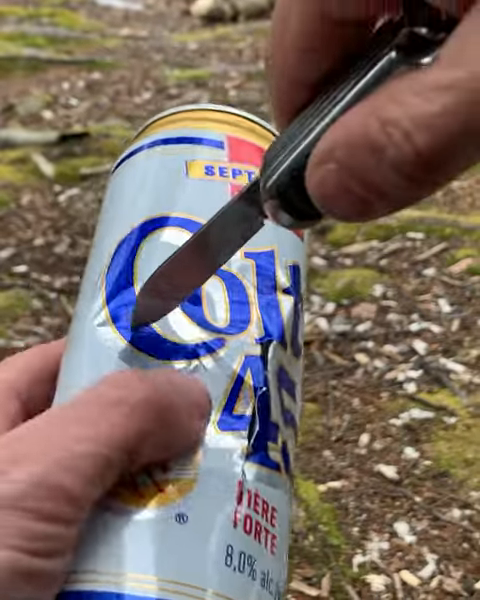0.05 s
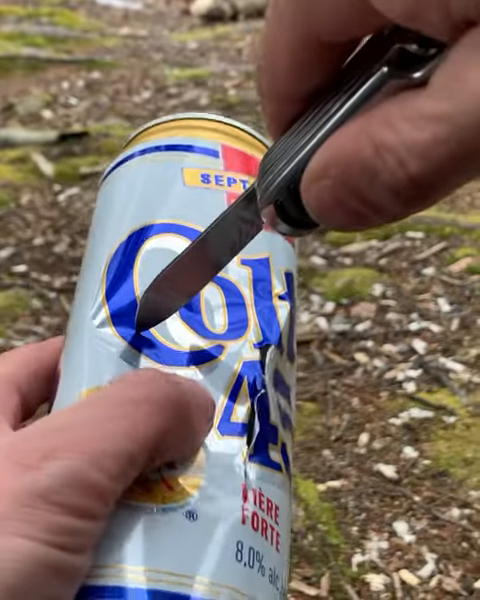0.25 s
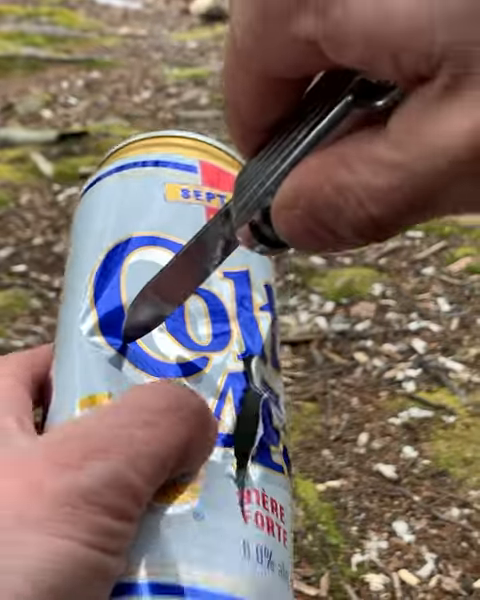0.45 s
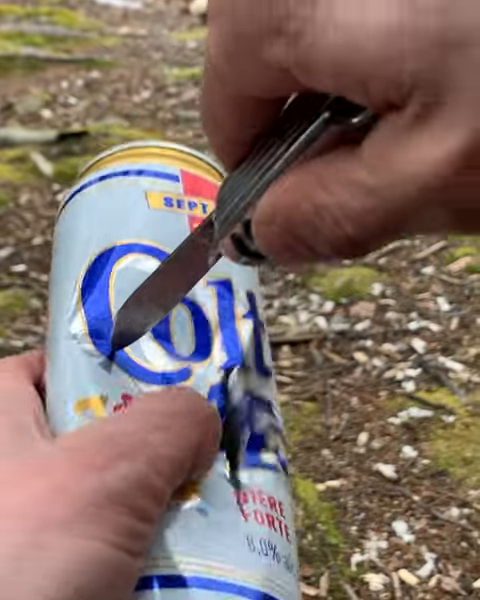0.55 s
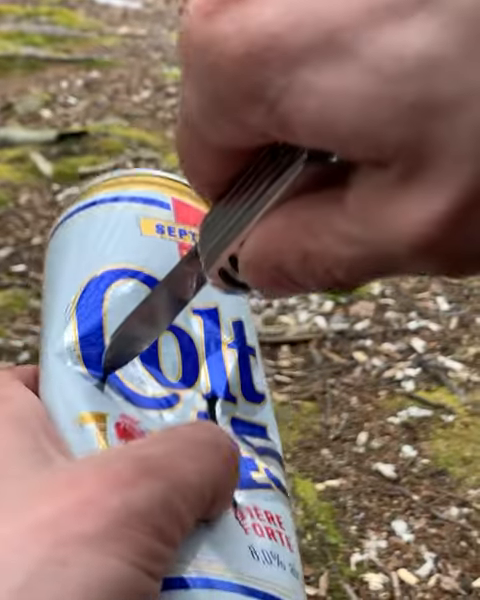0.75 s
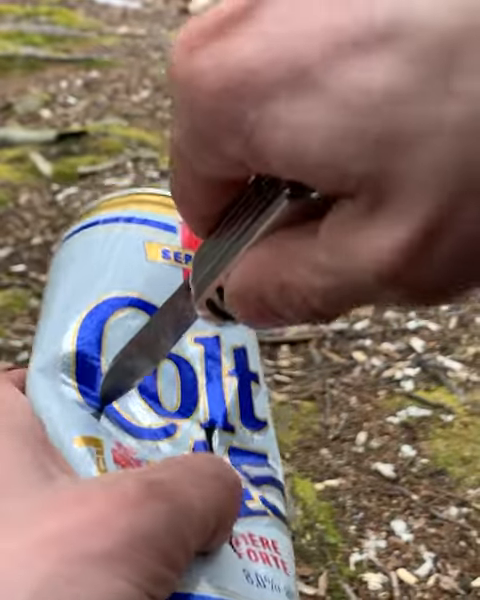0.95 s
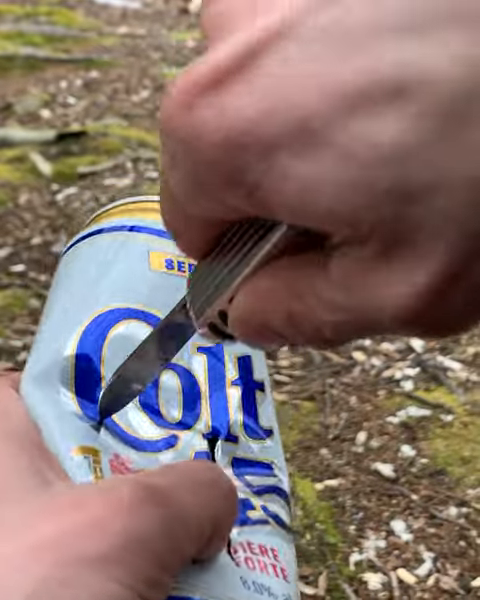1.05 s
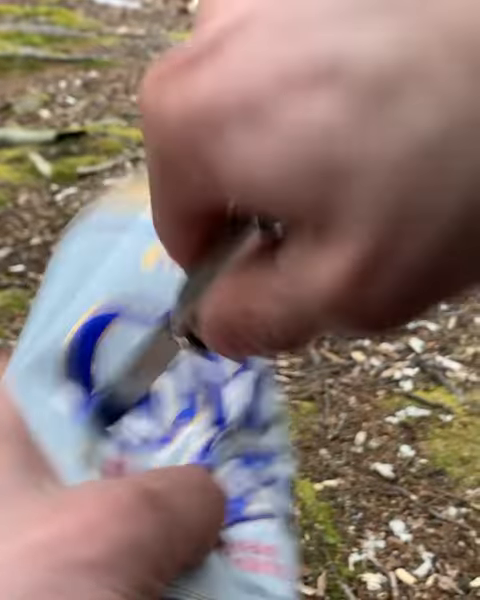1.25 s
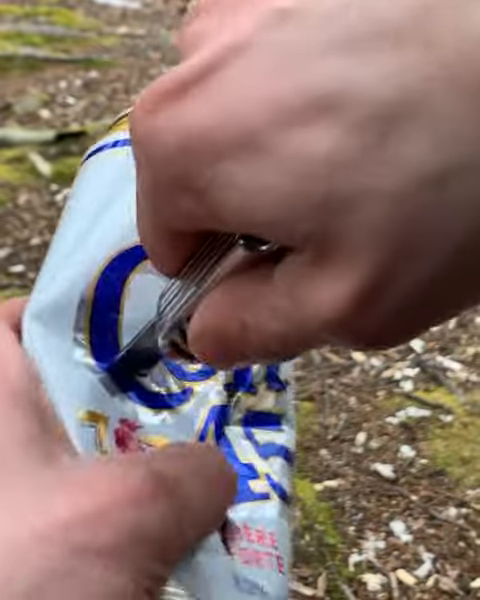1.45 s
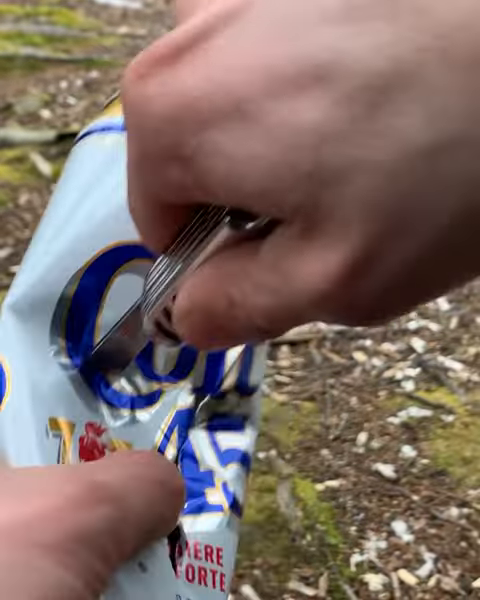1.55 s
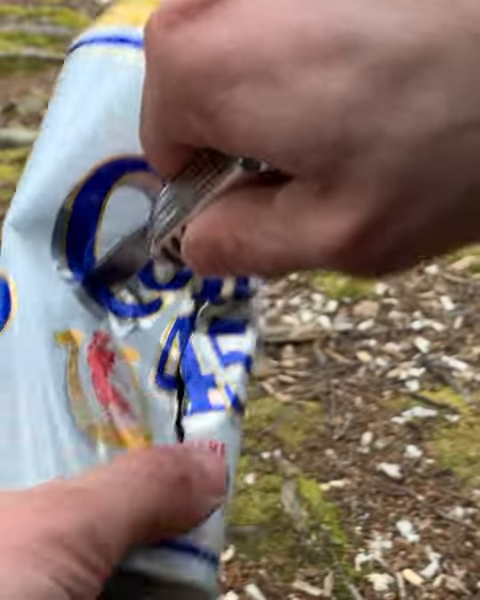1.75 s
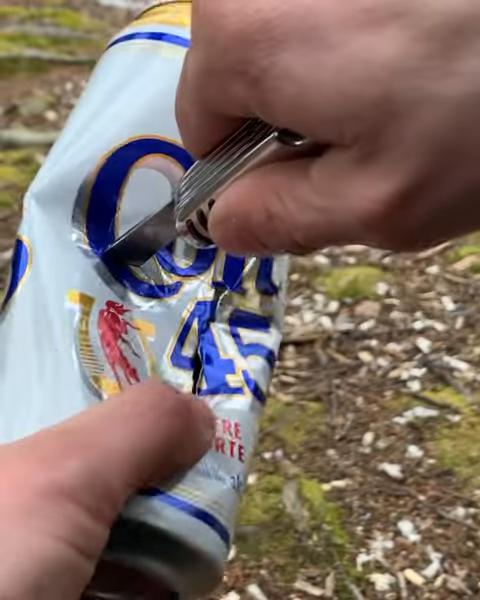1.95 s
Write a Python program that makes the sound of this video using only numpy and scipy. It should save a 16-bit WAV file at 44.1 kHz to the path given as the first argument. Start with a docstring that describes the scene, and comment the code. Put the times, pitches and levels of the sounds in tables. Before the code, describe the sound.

An empty aluminium can buckles under a knife point, close to the microphone. Scattered hollow pops and sharp clicks build into two dense crunches with faint scraping, over a soft outdoor rumble and hiss.

```python
"""Outdoors, close to the microphone: a knife point is pressed into an empty aluminium can.
Low rumble and soft hiss lie behind it. Up close, the blade scrapes faintly and the stressed foil ticks.
Wall panels snap through with short hollow pops; creases form with bright cracks, twice in a dense
crunch, and the thin shell rings briefly."""
import sys
import numpy as np
from scipy.fft import rfft, irfft, next_fast_len
from scipy.io import wavfile
from scipy.ndimage import map_coordinates

SR = 44100
rng = np.random.default_rng(int(sys.argv[2]) if len(sys.argv) > 2 else 0)


def store_wav(level_fs):
    """Save 16-bit WAV to argv[1]."""
    pcm = np.round(np.clip(np.atleast_2d(level_fs), -1, 1) * 32767)
    wavfile.write(sys.argv[1], SR, pcm.T.astype(np.int16))


N = 88200
TOP_HZ = 16900  # upper limit of the cracks and of the recorder


def amp(db):
    """Decibels to gain."""
    return 10 ** (np.asarray(db) / 20)


def unit(x):
    """Scale to rms 1."""
    return x / np.sqrt(np.mean(x ** 2) + 1e-20)


def colour(points, hz):
    """Gain at hz from (f/Hz, level/dB) points on a log frequency axis."""
    freqs, dbs = np.transpose(points)
    return amp(np.interp(np.log(hz + 1), np.log(freqs + 1), dbs))


def level(points):
    """Gain per sample from (t/s, level/dB) points."""
    return amp(np.interp(np.arange(N) / SR, *np.transpose(points)))


def filtered(x, response):
    """Pass x through a frequency response."""
    size = 2 * next_fast_len(len(x))
    return irfft(rfft(x, size) * response(np.fft.rfftfreq(size, 1 / SR)), size)[:len(x)]


def noise(spectrum):
    """Noise of rms 1, coloured by (f/Hz, level/dB) points."""
    return unit(filtered(rng.standard_normal(N), lambda hz: colour(spectrum, hz)))


def causal(gain):
    """Minimum-phase response with the given gain."""
    cepstrum = irfft(np.log(np.maximum(gain, 1e-6)))
    half = len(cepstrum) // 2
    cepstrum[1:half] *= 2
    cepstrum[half + 1:] = 0
    return np.exp(rfft(cepstrum))


def band(hz, lo_hz, hi_hz, order=5):
    """Band gain that keeps the power of white noise."""
    low_cut = 1 + (lo_hz / (hz + 1)) ** (2 * order)
    high_cut = 1 + (hz / hi_hz) ** (2 * order)
    return unit((low_cut * high_cut) ** -.5)


def wobble(rate, size):
    """A smooth random curve, rate knots a second."""
    knots = rng.standard_normal(int(size * rate / SR) + 4)
    return map_coordinates(knots, [np.arange(size) * rate / SR])


def add(out, start, sound):
    """Mix a sound in at start seconds."""
    part = out[max(round(start * SR), 0):][:len(sound)]
    part += sound[:len(part)]


# Colour of the rumble and the hiss behind the can: f/Hz, relative level/dB
RUMBLE_SPECTRUM = [(12, -36), (25, -18.5), (42, -3.5), (55, -6.5), (65, 2), (78, -8), (120, -8), (155, -17),
                   (230, -17.5), (400, -65)]
AIR_SPECTRUM = [(160, -14), (260, 3), (550, -1.5), (700, -6.5), (1250, -9.5), (1800, -21), (2800, -23),
                (6000, -31), (9000, -47.5), (16000, -48)]
# Their rise and fall: t/s, level/dB
RUMBLE_ENVELOPE = [(0, -39.5), (.4, -37), (1.1, -40.5), (1.25, -41.5), (1.35, -54.5), (1.5, -40.5),
                   (1.62, -52), (1.75, -39), (2, -42)]
AIR_ENVELOPE = [(0, -45.5), (1.2, -46), (1.35, -49.5), (1.62, -49), (1.8, -46.5), (2, -48.5)]


def outdoors():
    """Low rumble and soft hiss of open air; both dip after the loudest crunches."""
    rumble = level(RUMBLE_ENVELOPE) * noise(RUMBLE_SPECTRUM)
    hiss = level(AIR_ENVELOPE) * noise(AIR_SPECTRUM)
    return rumble + hiss


# Blade friction, faint even this close: t/s, level/dB
SCRAPE_ENVELOPE = [(0, -79), (.23, -71), (.27, -69), (.6, -73.5), (.8, -70), (1.1, -81.5), (1.2, -56.5),
                   (1.33, -49.5), (1.44, -57), (1.63, -58), (1.71, -53), (1.82, -60), (1.9, -82), (2, -79)]
# Colour of the friction and the ticks: f/Hz, relative level/dB
SCRAPE_SPECTRUM = [(300, -16), (1500, -3.5), (4000, 3), (7000, -1), (11000, 2), (16000, 3.5)]


def scrape(ticks_per_s=15, max_tick_db=-56, tick_t60=.008):
    """The blade slides on the wall with a fine hiss, and the stressed foil ticks."""
    ticks, t = np.zeros(N), np.arange(SR // 50) / SR
    for when, size in rng.random((int(ticks_per_s * N / SR), 2)):
        add(ticks, when * N / SR, size * amp(max_tick_db - 60 * t / tick_t60))
    return (level(SCRAPE_ENVELOPE) + ticks) * noise(SCRAPE_SPECTRUM)


# Resonances of the thin shell: f/Hz, width/Hz, relative level/dB
SHELL_MODES = [(848, 20, -15.5), (1288, 17, -7), (2046, 44, -6.5), (2013, 15, -7.5), (2670, 57, -3),
               (3080, 60, -13.5), (3454, 100, -9.5), (3860, 81, -12), (5140, 89, -16), (6940, 140, -6.5),
               (9800, 110, -17.5), (10570, 160, -10), (11200, 130, -12)]


def shell(excitation, direct_db=-3.5, modes_db=2.5):
    """The can's wall adds its resonances to whatever excites it."""
    def response(hz):
        modes = sum(amp(db + modes_db) * 1j * hz * width / (centre ** 2 - hz ** 2 + 1j * hz * width)
                    for centre, width, db in SHELL_MODES)
        return amp(direct_db) + modes
    return filtered(excitation, response)


# Panels left ringing: t/s, level/dB, starting f/Hz, glide/(Hz/s), t60/s
TAUT_PANELS = [(.425, -21, 645, -700, 0.14), (.418, -22.5, 530, -3, 0.14), (.79, -19.5, 1250, -2, 0.048),
               (1.152, -32.5, 670, -250, 0.34), (1.155, -24.5, 540, 0, .08), (1.263, -15.5, 905, -4, .11),
               (1.262, -10.5, 640, 3, 0.095), (1.523, -15, 1000, 0, .12), (1.585, -17.5, 441, -200, 0.088)]


def panel_rings(rise_s=.003):
    """Panels that stay taut ring on, each a dying tone; some slide down in pitch."""
    out, t = np.zeros(N), np.arange(SR // 4) / SR
    for start, db, hz, glide, t60 in TAUT_PANELS:
        envelope = amp(db - 60 * t / t60) * (1 - np.exp(-t / rise_s))
        add(out, start, envelope * np.sin(2 * np.pi * (hz + glide * t / 2) * t))
    return out


# Wall panels snapping through, close up: t/s, level/dB, f/Hz at the peak, swell/s
PANEL_SNAPS = [(0.078, -22, 436, 0.0036), (.0785, -23, 1022, 0.0024), (.239, -15.5, 690, .0015),
               (.2395, -17, 397, 0.0039), (.414, -15.5, 601, 0.0091), (.417, -11, 372, 0.0058),
               (.417, -20, 925, 0.0029), (0.4903, -19.5, 412, 0.0039), (.556, -22.5, 441, 0.0066),
               (0.571, -19, 375.5, 0.0098), (.5995, -20, 540, 0.0036), (.607, -24.5, 459, .005),
               (.778, -13.5, 481, 0.002), (.788, -11, 442, 0.0077), (.7878, -17, 1035, 0.0021),
               (.8255, -25, 516, 0.0024), (0.891, -13.5, 440, 0.0084), (.9878, -14.5, 547, 0.0017),
               (.995, -23, 492, 0.0091), (1.089, -11.5, 470, 0.0031), (1.098, -20, 477, 0.0027),
               (1.146, -8.5, 686, 0.0039), (1.1465, -15.5, 447, 0.0022), (1.2588, -3.5, 455.4, 0.0011),
               (1.272, -11, 487, 0.002), (1.2765, -22.5, 813, .004), (1.291, -13, 405, 0.0027),
               (1.447, -30.5, 463, 0.012), (1.4709, -14, 442, 0.0041), (1.482, -13.5, 530, 0.0025),
               (1.519, -5, 491, 0.0035), (1.5312, -6, 394, .003), (1.562, -11.5, 463, 0.00293),
               (1.581, -14, 472, 0.002), (1.751, -26.5, 983, 0.0026), (1.926, -22.5, 615, .0045),
               (1.957, -34, 500, 0.0057)]


def panel_pops(steepness=2.93, pitch_sag=.21, settle_s=.0083, ring_db=-17.5, ring_t60=.13):
    """A panel swings through and rings briefly, its pitch settling as the stress lets go."""
    out, t = np.zeros(N), np.arange(SR // 4) / SR
    for start, db, hz, swell in PANEL_SNAPS:
        progress = t / swell
        swing = (progress * np.exp(1 - progress)) ** steepness
        after_ring = amp(ring_db - 60 * t / ring_t60) * (1 - np.exp(-progress))
        pitch = hz * (1 + pitch_sag * (np.exp(-t / settle_s) - np.exp(-swell / settle_s)))
        tone = np.sin(2 * np.pi * np.cumsum(pitch) / SR)
        add(out, start, amp(db) * (swing + after_ring) * tone)
    return out


# Creases cracking, close up: t/s, relative level/dB of body, middle and treble, t60/s
CREASES = [(0.076, -25.5, -23, -27, 0.028), (0.1231, -33, -35, -61, 0.024),
           (.2388, -16.5, -10, -15.5, 0.024), (0.351, -64, -66, -57, .015), (.4128, -19, -23.5, -33, 0.033),
           (0.552, -34, -64, -60, 0.024), (.599, -29.5, -44.5, -49, 0.028),
           (0.757, -29.5, -22, -28.5, 0.034), (.774, -26, -17.5, -22.5, 0.031),
           (0.7862, -21, -10, -14, 0.024), (0.8903, -32, -34, -26.5, 0.017), (.988, -15, -48.5, -77, 0.031),
           (1.064, -58.5, -47.5, -71.5, 0.012), (1.0897, -32.5, -70, -78, .02),
           (1.145, -17.5, -16, -11, 0.016), (1.1478, -18.5, -9, -37, 0.02),
           (1.258, -16, -22.5, -20.5, 0.097), (1.266, -25, -13.5, -17, 0.085),
           (1.274, -15, -11.5, -7, 0.037), (1.28, -27, -21, -15.5, 0.034), (1.288, -17, -12, -12, 0.033),
           (1.315, -51, -57, -57, 0.014), (1.382, -38.5, -63, -61, 0.027), (1.407, -62, -65, -46, 0.016),
           (1.422, -52, -39.5, -39, 0.016), (1.4658, -28.5, -43.5, -42, 0.11),
           (1.481, -30, -39.5, -56, 0.12), (1.518, -10.5, -14.5, -14.5, 0.07),
           (1.5311, -14.5, -13, -38, .06), (1.558, -32, -29, -51, 0.14), (1.5738, -18.5, -15, -18.5, 0.053),
           (1.751, -34.5, -39.5, -43, 0.04), (1.859, -40.5, -56, -60, .02), (1.926, -35, -58, -69, 0.039),
           (1.959, -38, -63, -75, 0.032)]
# Where body, middle and treble begin: f/Hz
BAND_STARTS = [508, 1830, 6570]
# Colour of cracking aluminium: f/Hz, relative level/dB
CRACK_SPECTRUM = [(100, -36.5), (300, 13), (900, 4), (1080, 1.5), (1400, -2.5), (1650, -8.5), (1950, -5.5),
                  (2250, -7.5), (3000, -0.5), (3950, -1), (4300, -5.5), (4700, 0), (6100, -6.5), (6900, -5),
                  (10500, 5.5), (16000, -0.5)]


def cracks(rise_s=.0006, hold_s=.0017, slips_per_s=1200, grain_db=2.8, shimmer_db=-26.5, shimmer_t60=.13):
    """Each crease gives way in a burst of tiny slips that dies fast and leaves a faint shimmer."""
    out, t = np.zeros(N), np.arange(SR // 4) / SR
    tracks = np.zeros((len(BAND_STARTS), N))
    attack = 1 - np.exp(-t / rise_s)
    for start, *band_dbs, t60 in CREASES:
        fade = amp(-60 * np.maximum(t - hold_s, 0) / t60)
        slips = amp(grain_db * wobble(slips_per_s, len(t))) * rng.standard_normal(len(t))
        burst = unit(fade * slips) * np.sqrt(np.mean(fade ** 2))  # the fade alone sets the energy
        shimmer = rng.standard_normal(len(t)) * amp(shimmer_db - 60 * t / shimmer_t60)
        for track, db in zip(tracks, band_dbs):
            add(track, start, amp(db) * attack * (burst + shimmer))
    edges = [*BAND_STARTS, TOP_HZ]
    for track, low, high in zip(tracks, edges, edges[1:]):
        out += filtered(track, lambda hz: causal(band(hz, low, high) * colour(CRACK_SPECTRUM, hz)))
    return out


def scene():
    """The can close up, in mono, against the outdoor background."""
    return (outdoors() + panel_rings() + panel_pops() + shell(cracks() + scrape()))[None]


# Response of the microphone: f/Hz, level/dB
MIC_RESPONSE = [(20, 1), (7700, 1), (8300, -5.5), (8600, -19), (9000, -2), (9800, 1), (11000, 1),
                (12400, -3.5), (13400, -22), (14400, -5.5), (15600, -0.5), (16300, -31.5)]


def record(dry):
    """The microphone notches the treble; the recorder clips at full scale and is band-limited."""
    mic = filtered(dry[0], lambda hz: causal(colour(MIC_RESPONSE, hz)))
    clipped = np.clip(mic, -1, 1)
    return filtered(clipped, lambda hz: hz < TOP_HZ)[None]


dry = scene()
out = record(dry)
store_wav(out)
```